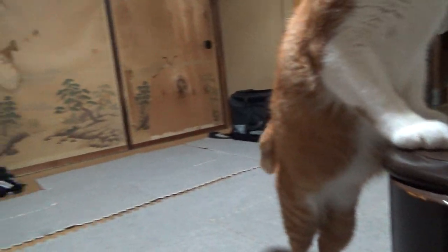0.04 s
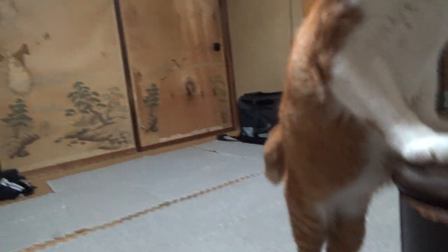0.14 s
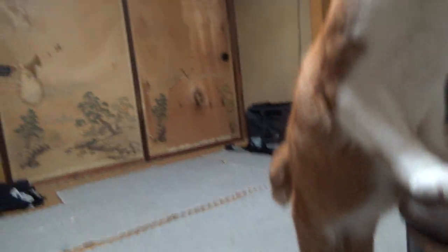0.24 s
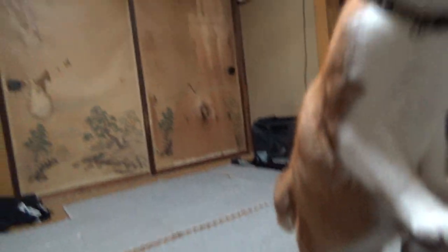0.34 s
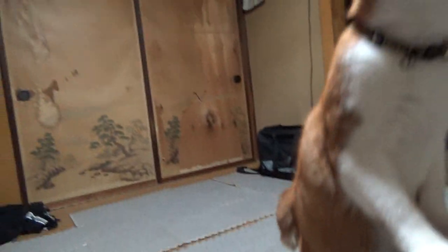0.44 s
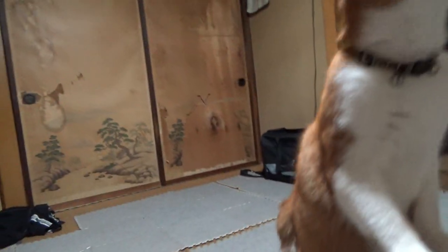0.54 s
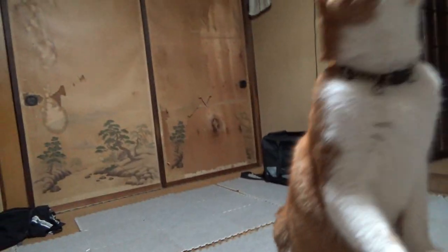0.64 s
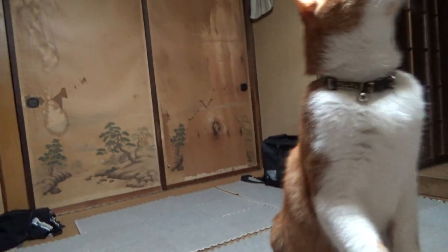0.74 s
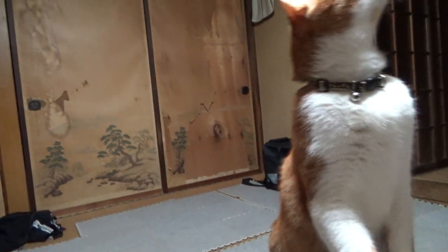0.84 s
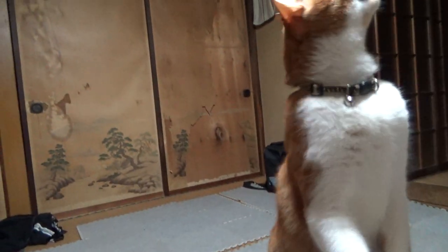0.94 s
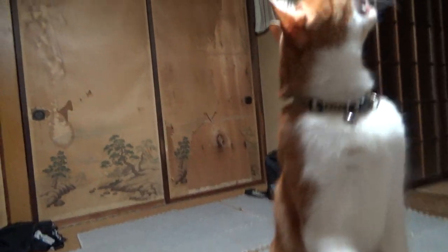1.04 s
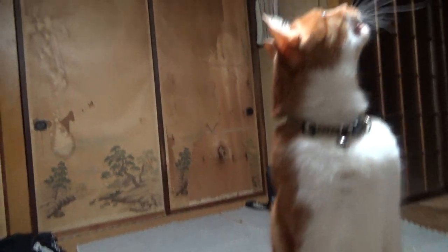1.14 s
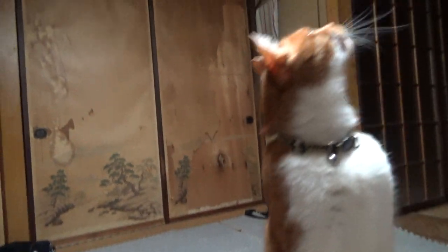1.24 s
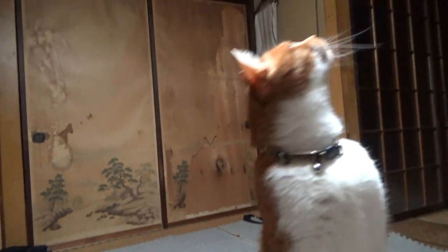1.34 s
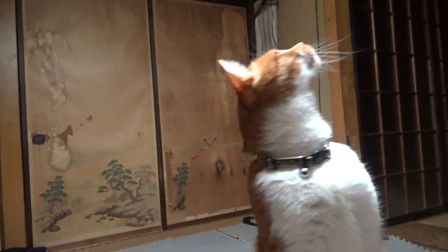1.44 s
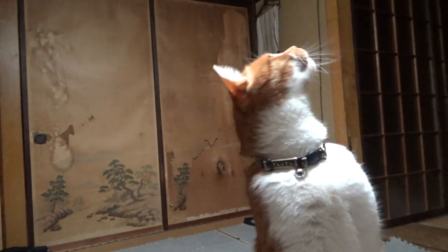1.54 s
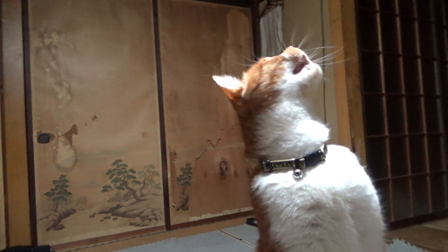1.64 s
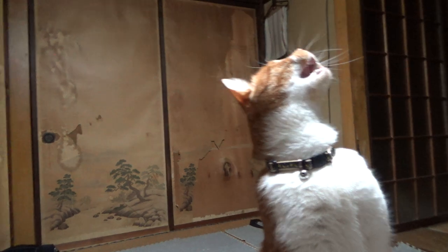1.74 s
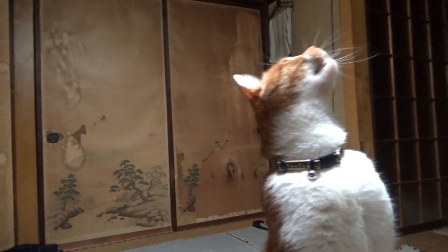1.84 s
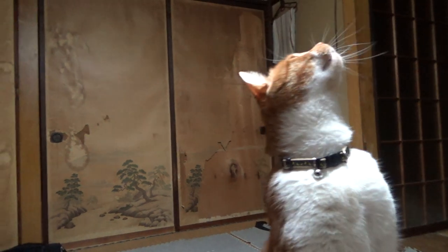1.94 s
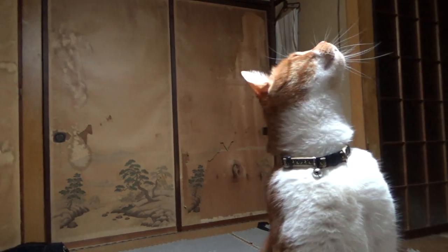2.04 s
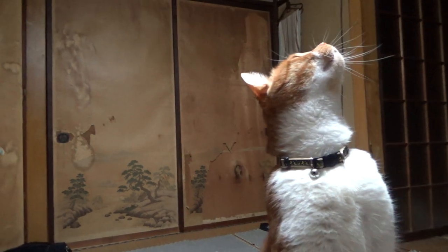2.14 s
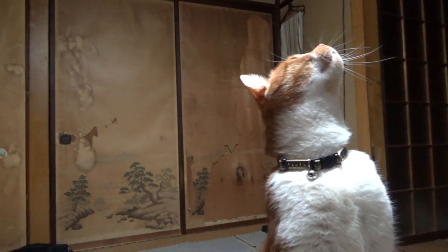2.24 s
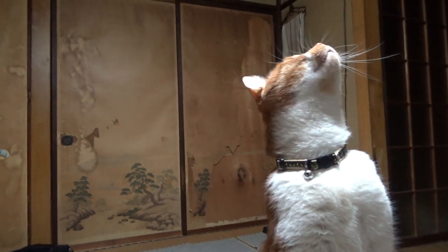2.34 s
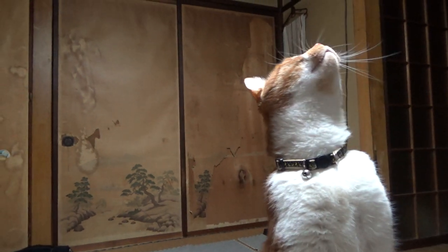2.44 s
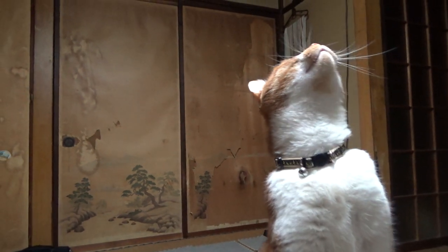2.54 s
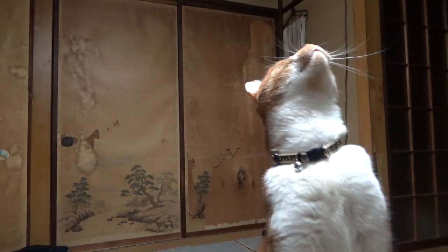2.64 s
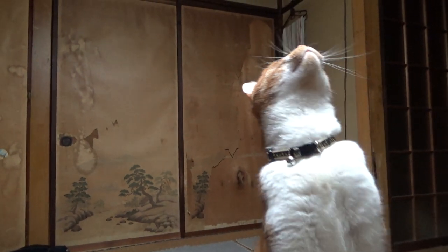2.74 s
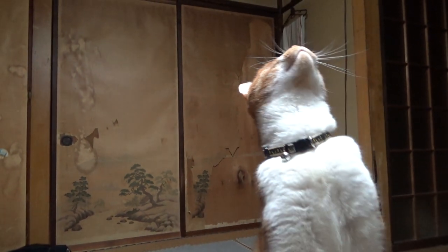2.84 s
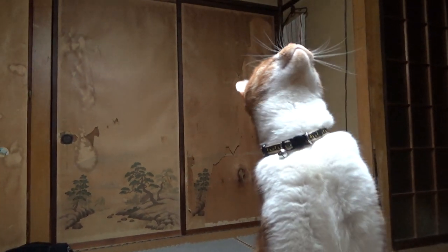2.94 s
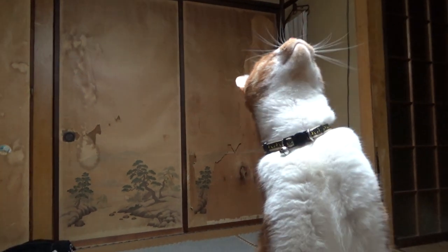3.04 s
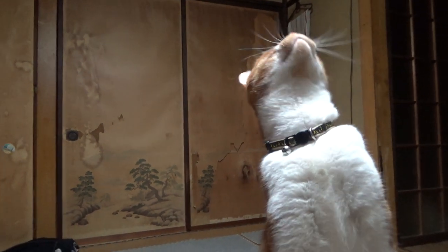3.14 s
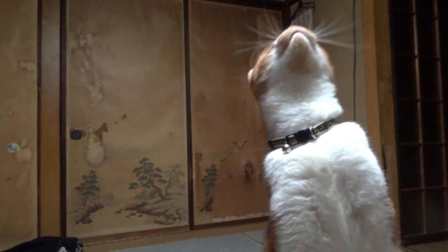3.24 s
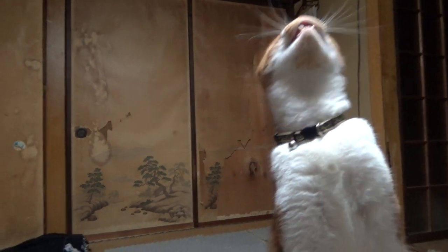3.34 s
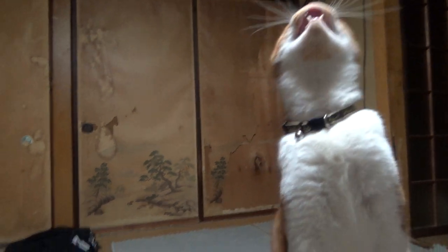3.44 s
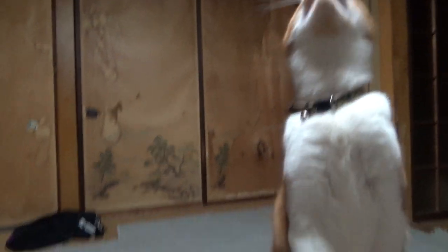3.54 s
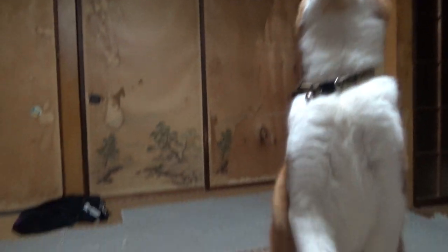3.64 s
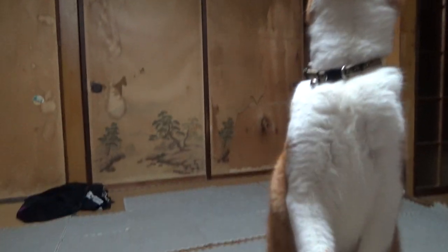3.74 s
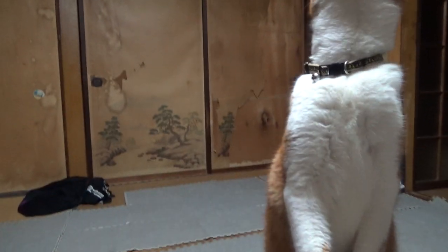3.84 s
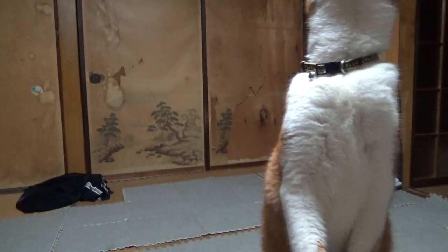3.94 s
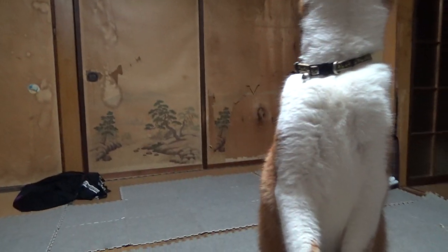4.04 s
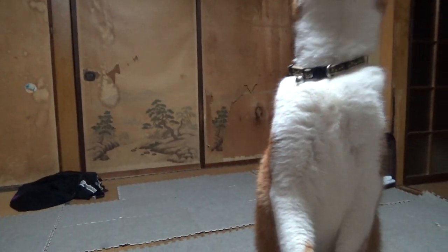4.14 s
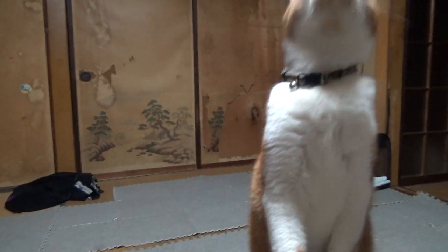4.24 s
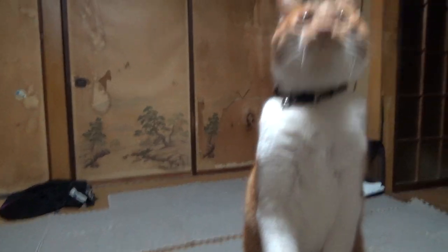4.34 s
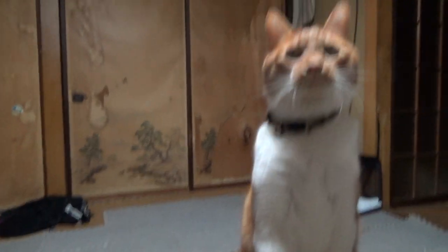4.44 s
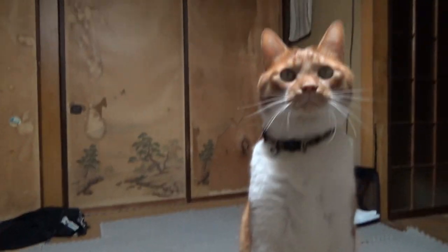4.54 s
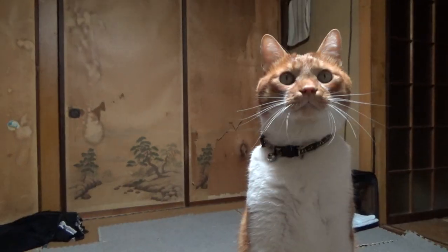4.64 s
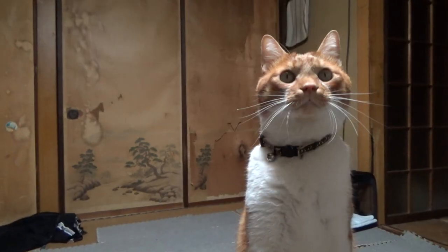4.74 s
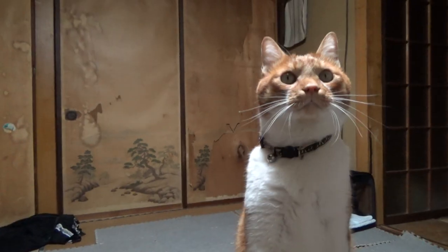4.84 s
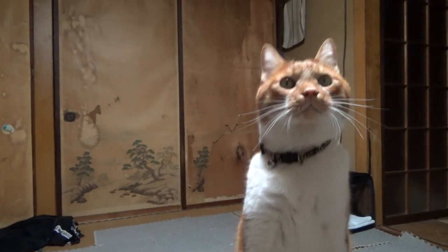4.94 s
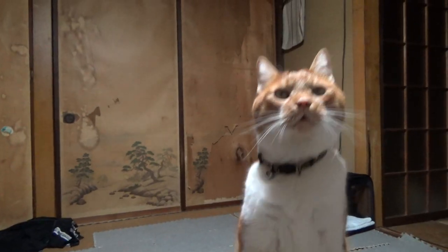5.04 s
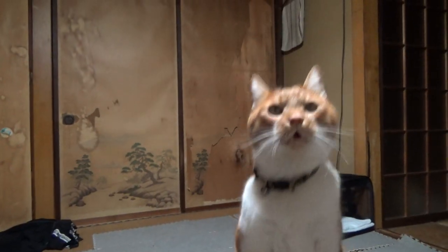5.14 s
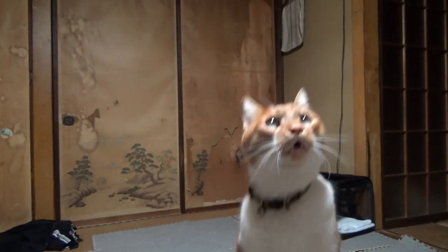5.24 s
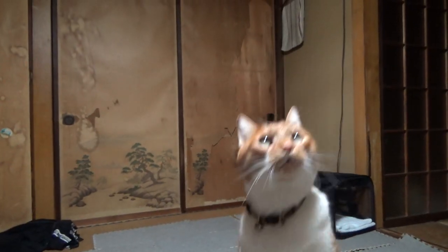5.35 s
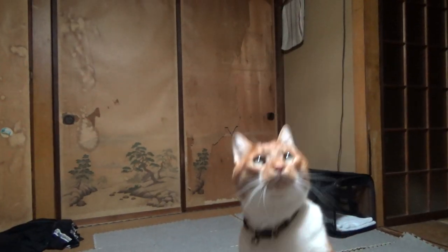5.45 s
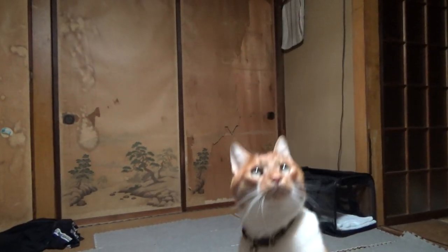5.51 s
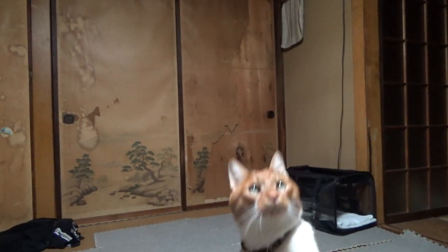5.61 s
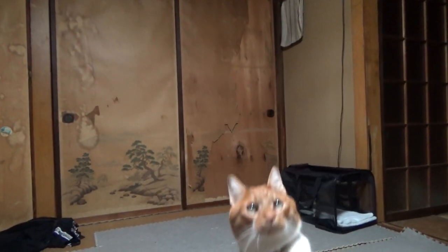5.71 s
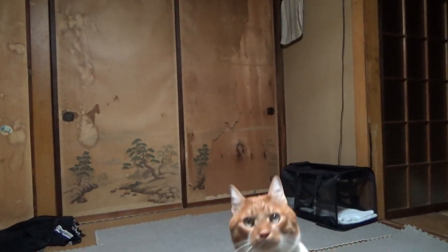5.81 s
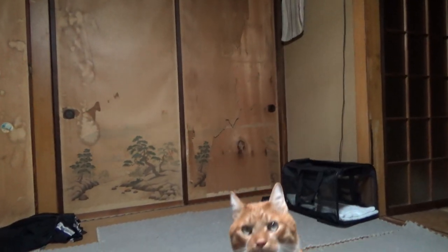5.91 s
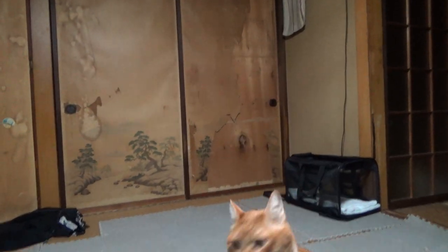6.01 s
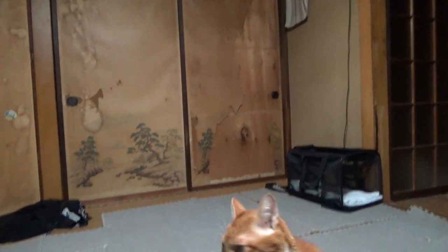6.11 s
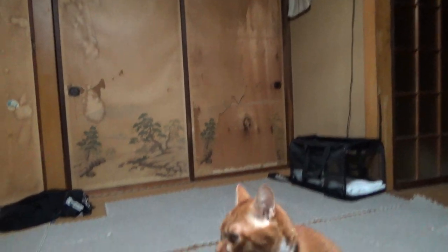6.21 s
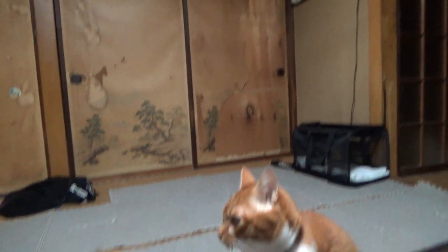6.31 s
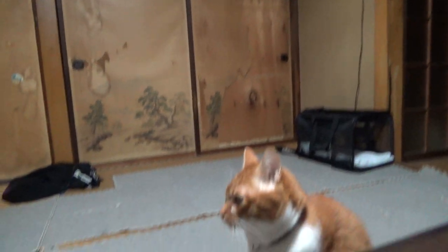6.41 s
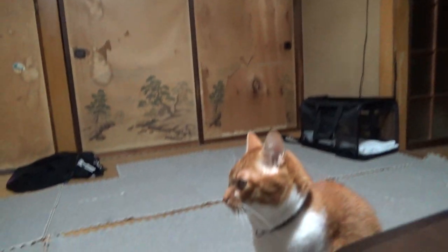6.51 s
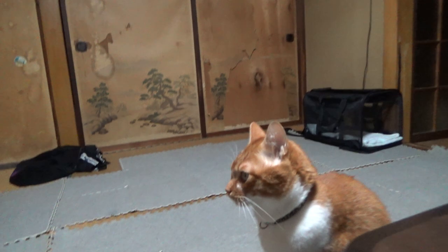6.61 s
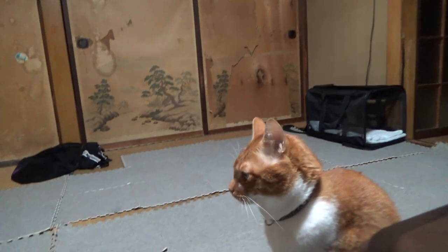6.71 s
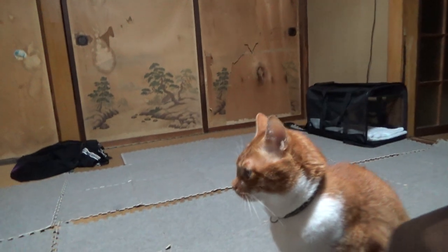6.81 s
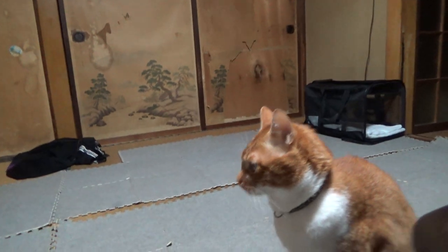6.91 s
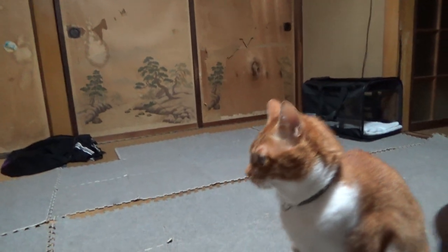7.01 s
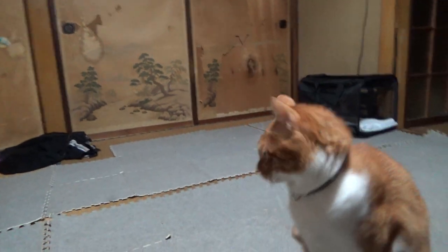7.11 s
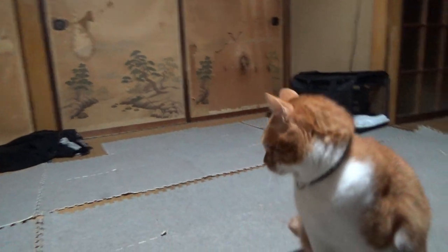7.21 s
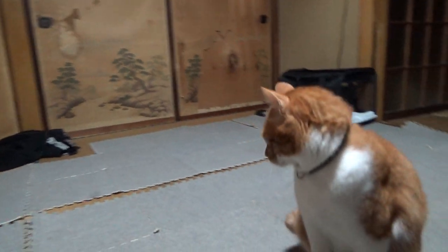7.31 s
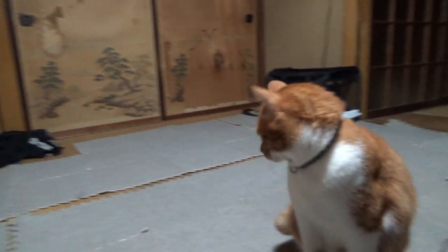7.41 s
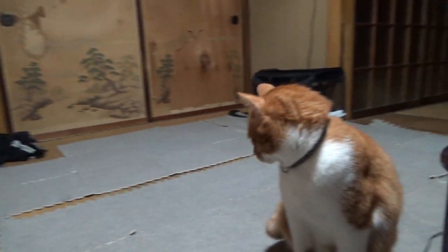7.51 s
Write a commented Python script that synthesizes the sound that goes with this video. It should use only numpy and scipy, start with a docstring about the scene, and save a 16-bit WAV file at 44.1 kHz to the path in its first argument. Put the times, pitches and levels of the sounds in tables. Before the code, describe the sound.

A cat close to the microphone gives a short chirped meow in a quiet room, then its small collar bell tinkles. Two more brief chirps follow, with sharp little clicks, soft paw landings and more tinkling. A longer, falling meow comes last, followed by a few dry clicks. Underneath, an appliance hums and blows softly, a wall clock ticks faintly and fur rustles.

```python
"""An appliance hums and blows softly in a quiet room; fur rustles and a thin whine comes and goes.
A cat on a straw mat gives three short chirped meows and a longer falling one: harmonics of its vocal
folds, shaped by the resonances of mouth, nose and throat. It swallows once, its paws land softly, and a
pellet tinkles in its collar bell. Some sharp clicks come from claws, lips and collar; other dry clicks
sound late on. A wall clock ticks as its gear rattles the case; the walls add a short reverberation."""
import sys
import numpy as np
from scipy import signal
from scipy.fft import rfft, irfft, next_fast_len
from scipy.io import wavfile
from scipy.ndimage import uniform_filter1d

SR = 44100
rng = np.random.default_rng(int(sys.argv[2]) if len(sys.argv) > 2 else 0)


def transcribe(signal):
    """Save signal, clipped to [-1, 1], as a 16-bit WAV file at the path in sys.argv[1]."""
    frames = np.atleast_2d(signal).T
    limited = np.clip(frames, -1, 1)
    pcm = np.round(limited * 32767).astype(np.int16)
    wavfile.write(sys.argv[1], SR, pcm)


N = 333837
TIME = np.arange(N) / SR

# slow swell of the appliance's air, which the rustle follows: (time [s], level [dB])
AIR_SWELL = [(0, -54), (.29, -52.5), (.86, -58.5), (1.16, -54), (1.62, -56.5), (1.96, -52), (2.93, -61.5),
             (3.31, -53.5), (3.71, -54.5), (4.07, -59), (4.43, -49.5), (4.7, -58.5), (5.63, -58),
             (6.101, -54.5), (6.72, -57.5), (7.1, -55), (7.4, -50), (7.57, -52)]


def from_db(db):
    """Decibels to amplitude ratio."""
    return 10 ** (np.asarray(db) / 20)


def unit_rms(x):
    """Normalisation to an rms of 1."""
    return x / np.sqrt(np.mean(x ** 2) + 1e-20)


def at_hz(points, hz):
    """Interpolation of (frequency, value) points on a logarithmic frequency axis."""
    return np.interp(np.log(hz + 1), np.log(np.array(points)[:, 0]), np.array(points)[:, 1])


def resonance(hz, centre_hz, width_hz):
    """Magnitude response of a damped resonator, 1 at its centre."""
    return 1 / np.sqrt(1 + ((hz ** 2 - centre_hz ** 2) / (hz * width_hz + 1)) ** 2)


def resonators(hz, peaks, order):
    """Parallel resonances add; a higher order steepens their skirts."""
    return sum(from_db(db) * resonance(hz, centre, width) ** order for centre, width, db in peaks)


def bandpass(x, edges_hz, order):
    """A band-pass filter attenuates what lies outside its two edges."""
    return signal.sosfilt(signal.butter(order, edges_hz, "band", fs=SR, output="sos"), x)


def drift(rate_hz, size=N):
    """Random fluctuation: low-passed noise of unit rms."""
    lowpass = signal.butter(2, rate_hz, fs=SR, output="sos")
    return unit_rms(signal.sosfilt(lowpass, rng.standard_normal(size + SR))[SR:])


def stereo_noise(gain_at):
    """Spectrally shaped noise of unit rms; a weak side signal partly decorrelates the channels."""
    # balance: (frequency [Hz], left minus right [dB])
    balance = [(30, 5), (70, -4.5), (200, -1.5), (400, 0.5), (700, -7.5), (1300, -3), (2400, -0.1)]
    # stereo width: (frequency [Hz], side minus mid [dB])
    width = [(40, -39), (100, -21), (700, -11), (2400, -27), (4400, -31), (8000, -12), (13000, -33)]
    size = next_fast_len(N)
    hz = np.arange(size // 2 + 1) * SR / size
    mid, side = rfft(rng.standard_normal((2, size))) * gain_at(hz)
    lean = from_db(at_hz(balance, hz) / 2)
    side = side * from_db(at_hz(width, hz))
    return unit_rms(irfft([mid * lean + side, mid / lean - side], size)[:, :N])


def appliance_air():
    """Moving air gives swelling broadband noise; duct resonances add steady narrow bands."""
    # airflow spectrum: (frequency [Hz], relative density [dB])
    spectrum = [(290, -12.5), (500, -7.5), (752, -2), (1090, -4), (1260, 2), (1390, -3.5), (1900, -16),
                (2470, -19), (4180, -120)]
    # duct resonances: (frequency [Hz], bandwidth [Hz], gain [dB])
    duct_modes = [(1019, 6, 11), (1243.5, 35, 7), (2065, 88, -3), (5280, 200, -15)]
    times, air_db = np.transpose(AIR_SWELL)
    swell = from_db(np.interp(TIME, times, air_db) + 1.15 * drift(5.4))
    air = swell * stereo_noise(lambda hz: from_db(at_hz(spectrum, hz)))
    ducts = from_db(-62) * stereo_noise(lambda hz: resonators(hz, duct_modes, 2))
    return air + ducts


def appliance_hum():
    """Two low pure tones with slight amplitude modulation, a little to the right."""
    # hum tones: (frequency [Hz], rms level before panning [dB])
    tones = [(120.2, -55.5), (103.2, -65)]
    hum = sum(from_db(db + .7 * drift(3)) * np.sin(2 * np.pi * hz * TIME) for hz, db in tones)
    return np.sqrt(2) * hum * from_db([[-1.2], [1.2]])


def room_tone():
    """The ambient noise floor: stationary, densest at low frequencies."""
    # ambient spectrum: (frequency [Hz], relative density [dB])
    spectrum = [(20, -24), (60, -10.5), (150, -8), (400, -10.5), (600, -21.5), (1070, -26.5), (1810, -26.5),
                (10300, -28.5), (16000, -33)]
    return from_db(-55) * stereo_noise(lambda hz: from_db(at_hz(spectrum, hz)) * (hz > 18))


def fur_rustle():
    """Friction of fur on the mat gives noise whose level flickers."""
    # rustle spectrum: (frequency [Hz], relative density [dB])
    spectrum = [(2500, -1), (4200, -2), (6000, 0.5), (9000, -16), (15000, -12)]
    mean_db, swell_share = -62.5, 0.57
    times, air_db = np.transpose(AIR_SWELL)
    rustle_db = mean_db + swell_share * (air_db - air_db.mean())
    envelope = from_db(np.interp(TIME, times, rustle_db) + 2.2 * drift(25))
    return envelope * stereo_noise(lambda hz: from_db(at_hz(spectrum, hz)))


def whine():
    """A faint, high pure tone, amplitude-modulated at random and gated on and off."""
    # spells of whining: (start [s], end [s])
    spells = [(0, .75), (1.2, 2.5), (3.27, 4.7), (5.83, 7.57)]
    pitch_hz, level_db = 13248, -73
    gate = uniform_filter1d(sum((TIME > start) * (TIME < end) * 1. for start, end in spells), size=800)
    return from_db(level_db + 2.5 * drift(15)) * gate * np.sin(2 * np.pi * pitch_hz * TIME)


def vocal_tract(hz, mouth_hz, jaw_db, bright_db, facing_db):
    """Formants: the resonances of mouth, nose, jaw and throat set the gain of a partial."""
    # nasal formant: (frequency [Hz], bandwidth [Hz], gain [dB])
    nose = (966, 255, -16.5)
    # open-jaw formants: (frequency [Hz], bandwidth [Hz], gain [dB])
    jaw = [(2750, 1530, 1.5), (4100, 4700, -27.5)]
    # throat formants: (frequency [Hz], bandwidth [Hz], gain [dB])
    throat = [(5325, 810, -4), (6246, 510, -4.5)]
    # treble beamed ahead of the muzzle: (frequency [Hz], bandwidth [Hz], gain [dB])
    beam = [(7450, 990, -5.5), (9550, 1600, -8.5), (12000, 2400, -35)]
    return (resonance(hz, mouth_hz, width_hz=645) ** 3
            + resonators(hz, [nose], 2)
            + from_db(jaw_db) * resonators(hz, jaw, 3)
            + from_db(bright_db) * resonators(hz, throat, 3)
            + from_db(bright_db + facing_db) * resonators(hz, beam, 3))


def meow(contour, manner):
    """Source and filter: the tract weights the vocal folds' partials; rough folds jitter and leak air."""
    # breath spectrum: (frequency [Hz], relative density [dB])
    breath_spectrum = [(1200, -14), (2500, 3), (4000, -19), (5800, -1), (8000, 2), (10500, -13),
                       (13000, -45)]
    jaw_follows_treble, jaw_closing_db_per_s = 0.82, 60
    hoarseness, jitter, waver_db = 0.22, 0.045, 2.0
    times, pitches, levels_db, mouths, brights = np.transpose(contour)
    jaw_db, facing_db, rough, onset_s, ending_s, subharmonic = manner
    span = slice(int(times[0] * SR), int(times[-1] * SR))
    t = TIME[span]
    size, elapsed, remaining = len(t), t - times[0], times[-1] - t
    pitch, mouth_hz, bright_db = [np.interp(t, times, column) for column in (pitches, mouths, brights)]
    effort = np.interp(t, times, from_db(levels_db))
    jaw_db = jaw_db + jaw_follows_treble * bright_db - jaw_closing_db_per_s * elapsed
    hoarse_ends = np.clip(2 - elapsed / onset_s, 0, 1) + np.clip(2 - 2 * remaining / ending_s, 0, 1)
    rough = np.clip(rough + hoarseness * hoarse_ends, 0, 1)
    phase = 2 * np.pi * np.cumsum(pitch * (1 + jitter * rough * drift(120, size))) / SR
    voice = 0
    for k in np.arange(2, 37) / 2:   # period doubling puts partials half-way between the harmonics
        gain = vocal_tract(k * pitch, mouth_hz, jaw_db, bright_db, facing_db)
        gain *= from_db(waver_db * drift(18, size) * (k > 2))   # upper partials waver as the mouth shifts
        angle = k * phase + rng.normal(0, 0.79)
        smear = rough * drift(220, size)
        share = np.clip(subharmonic * rough, 0, 1) if k % 1 else 1
        voice -= gain * share * ((1 - rough / 2) * np.cos(angle) + smear * np.sin(angle))
    hz = np.arange(size // 2 + 1) * SR / size
    breath = unit_rms(irfft(rfft(rng.standard_normal(size)) * from_db(at_hz(breath_spectrum, hz)), size))
    voice += from_db(-12 + bright_db / 2) * rough * breath * (1 + np.cos(phase))   # a puff each cycle
    fade = np.clip(np.minimum(elapsed, remaining) / .003, 0, 1)
    out = np.zeros(N)
    out[span] = np.sqrt(2) * effort * voice * fade
    return out


def meows():
    """Phonation with gliding pitch and formants: three chirps and a falling call, one signal each."""
    # one contour per meow: (time [s], pitch [Hz], level [dB], mouth resonance [Hz], treble gain [dB])
    contours = [
        [(.277, 857, -23, 1700, -19), (.283, 906, -21.5, 1860, -17.5), (.297, 895, -14, 1800, -16.5),
         (.301, 804.6, -16.5, 1850, -13.5), (.315, 806, -17, 1890, -4.5), (.320, 878.5, -13.5, 1830, -18),
         (.328, 817, -23, 1690, -3.5), (.345, 843, -20, 1440, -12), (.356, 890, -47, 1400, -2)],
        [(1.751, 894, -62, 1850, -3), (1.757, 942, -27.5, 1860, -19), (1.770, 944, -25.5, 1890, -13),
         (1.783, 1017, -20, 1900, -17.5), (1.800, 1045, -28.5, 2060, -9), (1.812, 1036, -34, 1960, -8),
         (1.830, 980, -33, 2000, 2)],
        [(3.472, 854, -27, 1900, -9), (3.478, 959, -27.5, 1900, -4), (3.490, 934, -18.5, 1860, -9.5),
         (3.496, 864.6, -20.5, 1810, -2.5), (3.525, 855, -22, 1700, -1.5), (3.532, 945, -20, 1760, -16),
         (3.537, 1000, -66, 1800, 6)],
        [(5.237, 795, -62, 1410, 6), (5.243, 800, -30, 1490, -4), (5.253, 902, -23.5, 1330, -7.5),
         (5.261, 794, -28, 1510, -1.5), (5.272, 885, -25.5, 1560, 2.5), (5.284, 920, -26.5, 1610, -7),
         (5.310, 924.6, -22.5, 1600, -18), (5.350, 885, -24, 1360, -23.5), (5.395, 845.5, -35.5, 1180, -7.5),
         (5.445, 864, -35.5, 1260, -20), (5.500, 814, -37, 1070, -18), (5.540, 749, -44, 927, -35),
         (5.562, 734, -65, 920, -30)],
    ]
    # voice quality per meow: (jaw resonance [dB], treble by the turn of the head [dB],
    # steady roughness [0-1], hoarse onset [s], hoarse ending [s], subharmonics per roughness [ratio])
    manners = [(-5.5, -22.5, 0.14, 0.0036, 0.026, 0.39), (4.5, -5, 0.09, 0.021, 0.025, 0.72),
               (-2, -22.5, 0, 0.019, 0.022, 0.65), (-14.5, -13.5, .01, 0.032, 0.043, 2.1)]
    return [meow(contour, manner) for contour, manner in zip(contours, manners)]


def hisses():
    """Turbulence at the teeth in the first meow, later friction on the mat: noise swells, stops short."""
    # breath, dragged paw, dragged fur: (start [s], end [s], low edge [Hz], high edge [Hz], level [dB])
    events = [(0.28, .372, 9000, 13500, -48), (5.612, 5.645, 5400, 11300, -55.5),
              (6.655, 7.03, 4640, 6800, -63)]
    out = np.zeros(N)
    for start, end, low_hz, high_hz, level_db in events:
        progress = np.clip((TIME - start) / (end - start), 0, 1)
        swell = (progress * (1 - progress ** 8)) ** 0.36
        noise = unit_rms(bandpass(rng.standard_normal(N), [low_hz, high_hz], 3))
        out += from_db(level_db + 4.9 * drift(120)) * swell * noise
    return out


def strike(times, levels_db, modes):
    """Modal ringing: every impact excites each mode as a damped sine of its own strength."""
    scatter_db = rng.normal(0, 2, (len(times), len(modes)))
    signs = rng.choice([-1, 1], scatter_db.shape)   # a mode starts inward or outward by where it is hit
    out = np.zeros(N)
    for k, (hz, mode_db, t60) in enumerate(modes):
        impulses = np.zeros(N)
        impulses[(times * SR).astype(int)] = from_db(levels_db + mode_db + scatter_db[:, k]) * signs[:, k]
        decay, angle = from_db(-60 / (t60 * SR)), 2 * np.pi * hz / SR
        feedback = [1, -2 * decay * np.cos(angle), decay * decay]
        out += signal.lfilter([0, np.sin(angle)], feedback, impulses + 1e-18)
    return out


def clock():
    """Once a second the gear steps: quick impacts excite the heavily damped modes of a plastic case."""
    # case modes: (frequency [Hz], gain [dB])
    case_modes = [(2600, -8), (4200, -6), (5200, -2.5), (6000, -3), (6800, -2), (8000, -8), (9600, -7.5)]
    first_tick_s, ticks, t60_s = .313, 8, .007
    lags_s = np.array([-.012, -.005, 0, .002, .005, .009, .014, .022, .030, .040])
    contact_db = -43 - np.abs(lags_s) * np.where(lags_s < 0, 800, 250)   # fast rise, slower fall
    times = first_tick_s + np.arange(ticks)[:, None] + lags_s + rng.normal(0, .0007, (ticks, len(lags_s)))
    return strike(times.ravel(), np.tile(contact_db, ticks), [(hz, db, t60_s) for hz, db in case_modes])


def gulp():
    """Bubble resonance in the throat: a short falling tone as the cat swallows after its first meow."""
    start_s, end_s, from_hz, to_hz = .348, .372, 640, 430
    progress = np.clip((TIME - start_s) / (end_s - start_s), 0, 1)
    phase = 2 * np.pi * np.cumsum(from_hz * (to_hz / from_hz) ** progress) / SR
    return from_db(-37.5) * np.sin(np.pi * progress) * np.sin(phase)


def collar_bell():
    """A pellet's impacts excite two groups of shell modes; it rattles faintly while the collar swings."""
    # clear strikes on the bell wall: (time [s], level of high modes [dB], level of low modes [dB])
    tinkles = [(0.712, -43, -57), (0.8639, -31, -58), (0.904, -32, -53), (0.9123, -31, -47),
               (0.9327, -38, -55), (1.059, -61, -39.5), (1.1151, -27.5, -42), (1.1458, -42, -42),
               (1.2526, -36.5, -50), (1.3176, -42, -42), (1.4331, -44, -93), (1.5515, -44, -59),
               (1.577, -45, -52), (1.648, -36, -57), (2.7701, -43.5, -66), (3.3097, -36, -50),
               (3.3507, -38.5, -60), (3.4331, -37, -49.5), (4.01, -43, -48), (4.354, -38.5, -55),
               (4.4605, -23.5, -42), (4.4761, -35, -45), (4.4844, -31, -50)]
    # swings of the collar: (start [s], end [s])
    swings = [(.7, 1.7), (2.52, 2.8), (3.28, 3.47), (4.0, 4.12), (4.33, 4.52), (6.1, 6.22), (6.83, 6.93)]
    # high shell modes: (frequency [Hz], gain [dB], 60 dB decay time [s])
    high_modes = [(10290, -3, 0.032), (10750, -10.5, 0.024), (10400, -8, 0.011)]
    # low shell modes: (frequency [Hz], gain [dB], 60 dB decay time [s])
    low_modes = [(4310, -3.5, 0.02), (4370, 5.5, 0.025), (4560, -8, 0.011)]
    # soft contact confines the high and the low ring to a band each: (low edge [Hz], high edge [Hz])
    bands = [(9000, 11800), (3900, 5000)]
    rattles_per_s, rattle_high_db, rattle_low_db = 30, -50, -61
    times, high_db, low_db = np.transpose(tinkles)
    rattles = np.concatenate([rng.uniform(a, b, int((b - a) * rattles_per_s)) for a, b in swings])
    scatter_db = rng.standard_normal((len(rattles), 2))
    times = np.concatenate([times, rattles])
    high = strike(times, np.concatenate([high_db, rattle_high_db + scatter_db[:, 0]]), high_modes)
    low = strike(times, np.concatenate([low_db, rattle_low_db + scatter_db[:, 1]]), low_modes)
    return bandpass(high, bands[0], 1) + bandpass(low, bands[1], 1)


def contact_bursts(events, decay_cycles):
    """Impact transients: band noise whose exponential damping is 30 dB per decay_cycles periods."""
    size = 3000
    out, t = np.zeros(N), np.arange(size) / SR
    for start_s, peak_db, hz, octaves in events:
        envelope = np.sqrt(t) * from_db(-30 * t * hz / decay_cycles)
        edge_ratio = 2 ** (octaves / 2)
        edges_hz = [hz / edge_ratio, min(hz * edge_ratio, 18000)]
        burst = bandpass(rng.standard_normal(size) * envelope, edges_hz, 2)
        start = int(start_s * SR)
        out[start:start + size] += from_db(peak_db) * burst / np.abs(burst).max()
    return out


def clicks():
    """Brief sharp transients: the cat's claws, lips and collar, and, apart from these, late dry clicks."""
    # clicks: (time [s], peak level [dB], centre frequency [Hz], bandwidth [octaves])
    contacts = [(.7414, -41, 6500, 1.4), (0.8198, -42, 6800, .6), (1.2368, -41, 6000, 0.45),
                (1.8165, -25.5, 5600, 1.0), (2.496, -35.5, 4270, 1.1), (3.264, -40, 3340, 1.4),
                (3.5284, -18, 4270, 0.67), (3.5427, -21.5, 3140, 1.5), (4.9514, -32.5, 8550, 0.53),
                (5.724, -24.5, 8200, 1.35), (5.7936, -46, 10500, .4), (5.818, -43, 11500, .3)]
    return contact_bursts(contacts, decay_cycles=25)


def paws():
    """Soft landings are slow impacts, so their energy lies at low frequencies."""
    # landings: (time [s], peak level [dB], centre frequency [Hz], bandwidth [octaves])
    landings = [(1.233, -46, 168, 1), (3.613, -39, 340, 0.73), (3.698, -42, 155, 0.93),
                (5.617, -45, 150, 0.68)]
    return contact_bursts(landings, decay_cycles=9.7)


def reverberation(x):
    """Dense wall reflections act as noise that decays band by band, nearly alike in both channels."""
    # reverberation time: (frequency [Hz], 60 dB decay time [s])
    decay_times = [(500, 0.33), (2000, 0.23), (6000, 0.25), (12000, 0.19)]
    first_echo_s, reverb_db, side_db = 0.0066, -10, -30
    t, tail = np.arange(SR // 2) / SR, 0
    edges_hz = 300 * 2 ** np.arange(0, 6, .8)
    for low, high in zip(edges_hz, edges_hz[1:]):
        band = bandpass(rng.standard_normal((2, len(t))), [low, high], 2)
        tail += band * from_db(-60 * t / at_hz(decay_times, np.sqrt(low * high)))
    tail *= np.clip(t / first_echo_s - 1, 0, 1)
    mid, side = signal.fftconvolve(x[None], tail / np.sqrt(np.sum(tail[0] ** 2)), axes=1)[:, :N]
    side = side * from_db(side_db)
    return from_db(reverb_db) * np.array([mid + side, mid - side])


def scene():
    """Superposition of direct sound, reverberation and background; level differences place the cat."""
    # balance of each meow: (left minus right [dB])
    meow_balance = [-2.3, -1.4, -0.93, -1.1]
    sides = np.array([[.5], [-.5]])
    calls = meows()
    body = hisses() + gulp() + paws()
    small_sounds = clicks() + collar_bell()
    ticks = clock()
    direct = (body + small_sounds + ticks) * from_db(-0.5 * sides)
    direct += sum(call * from_db(balance_db * sides) for call, balance_db in zip(calls, meow_balance))
    # small high sounds reach the walls less
    reflected = reverberation(sum(calls) + body + from_db(-5) * small_sounds + from_db(4) * ticks)
    background = fur_rustle() + appliance_air() + room_tone() + appliance_hum() + whine()
    return direct + reflected + background


def record(dry):
    """Band limiting: a steep elliptic low-pass removes the highest treble."""
    cutoff_hz = 15850
    return signal.sosfilt(signal.ellip(12, .3, 75, cutoff_hz, fs=SR, output="sos"), dry)


dry = scene()
out = record(dry)
transcribe(out)
```